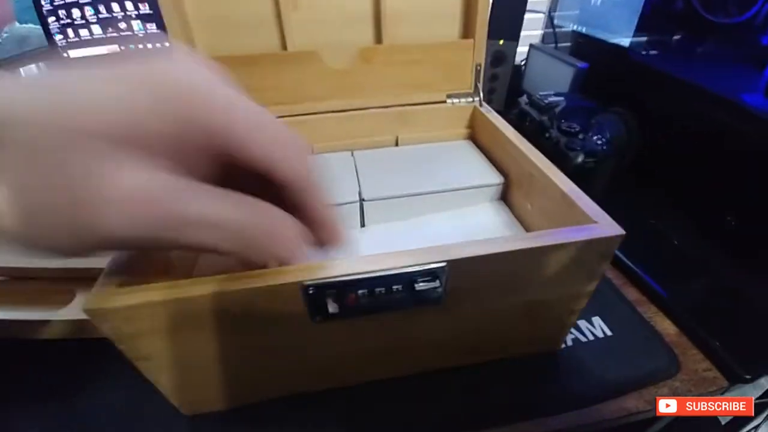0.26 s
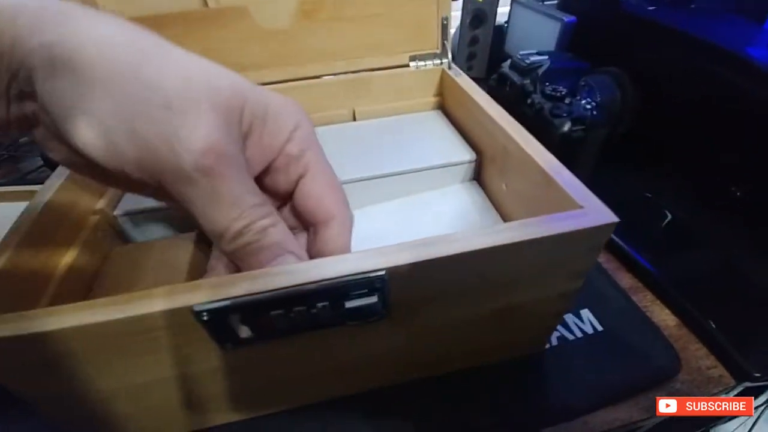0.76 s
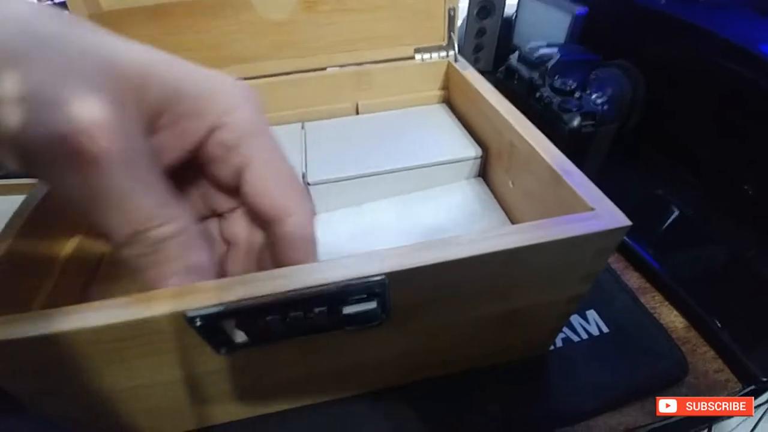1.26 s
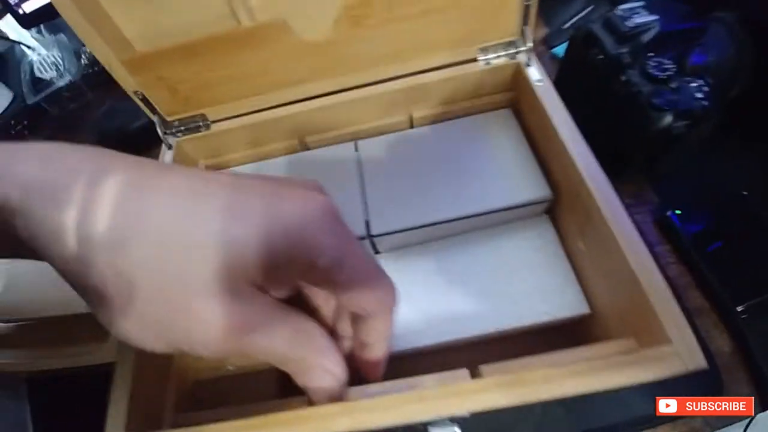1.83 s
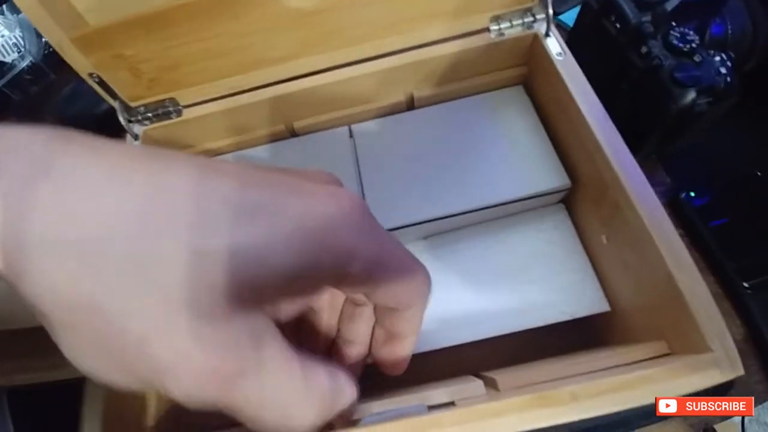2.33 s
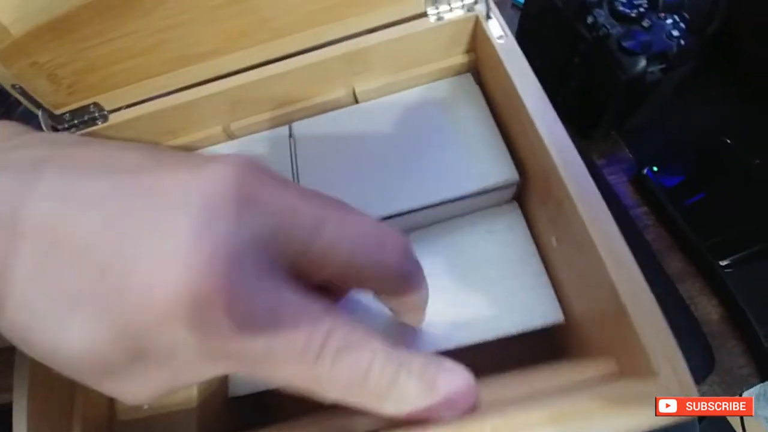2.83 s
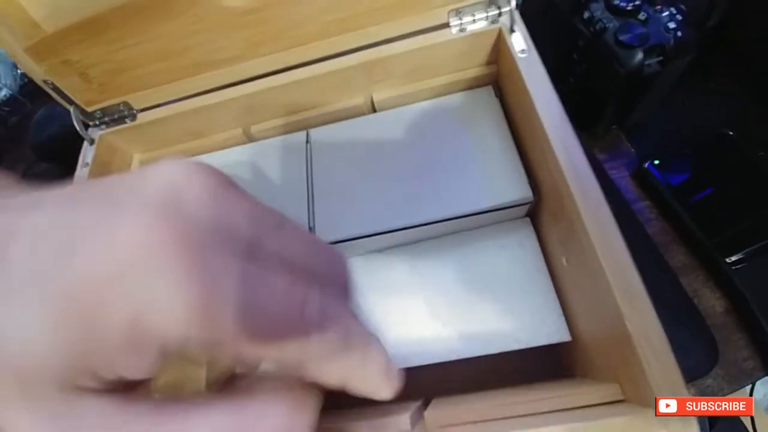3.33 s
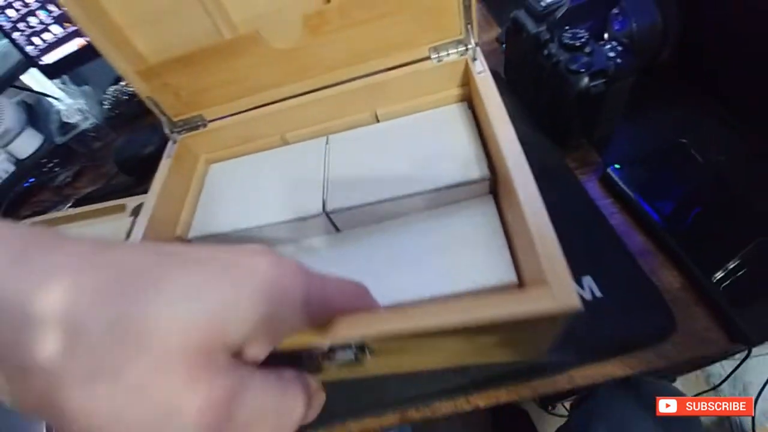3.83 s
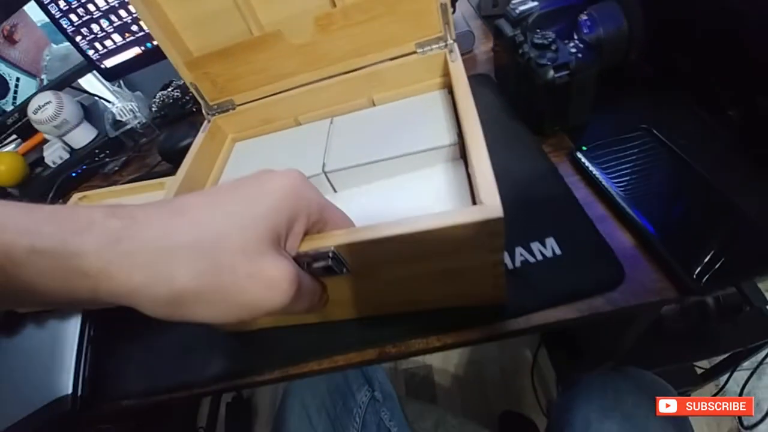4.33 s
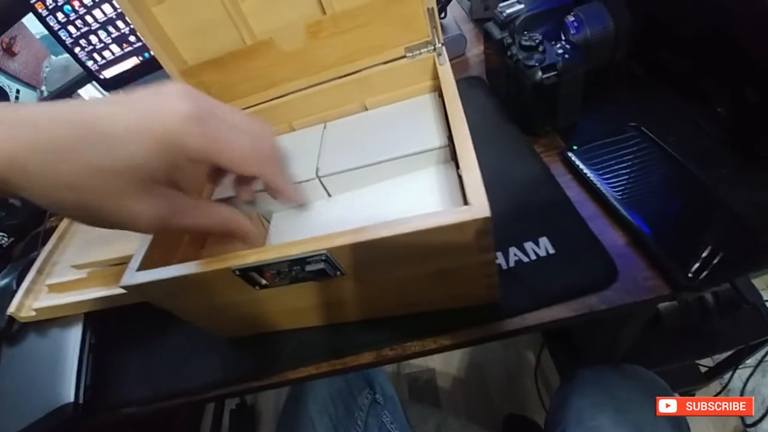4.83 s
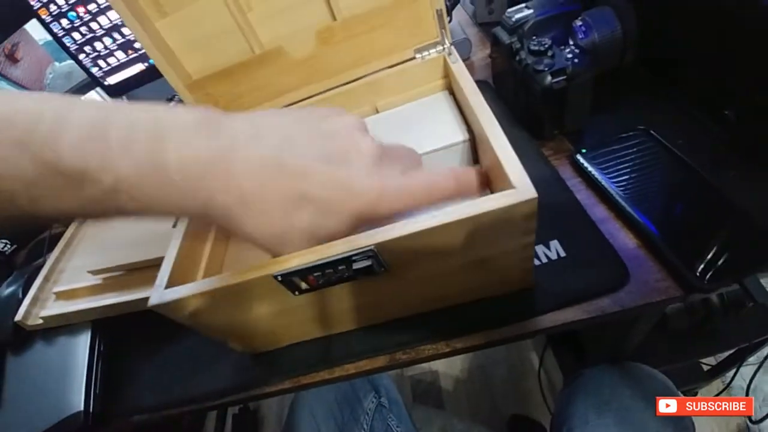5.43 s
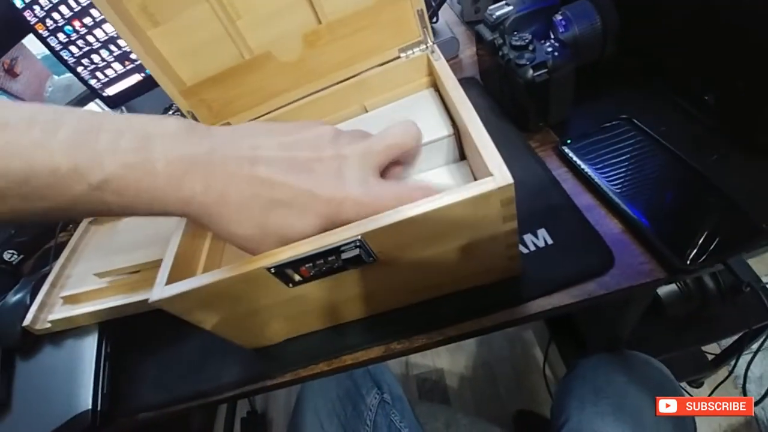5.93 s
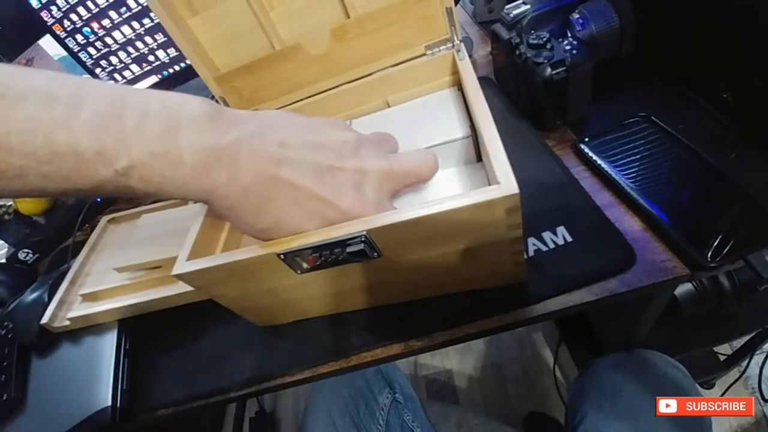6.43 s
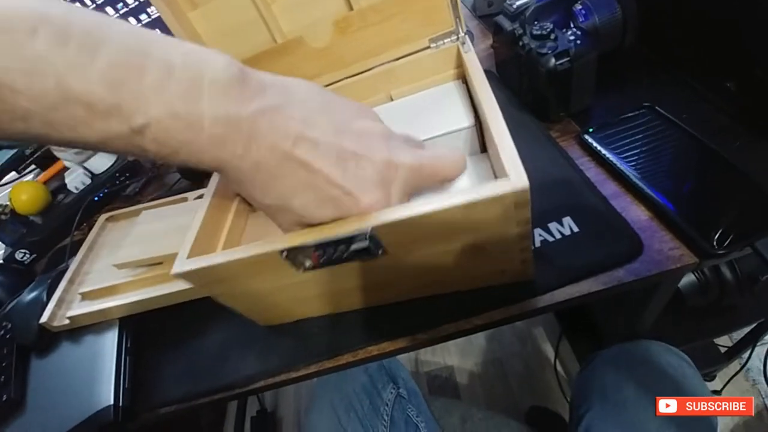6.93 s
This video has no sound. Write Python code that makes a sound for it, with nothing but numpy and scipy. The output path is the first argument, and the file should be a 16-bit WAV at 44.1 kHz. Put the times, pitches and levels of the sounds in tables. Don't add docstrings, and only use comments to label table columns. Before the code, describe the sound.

Close stereo pickup in a small, dull room, with low wavering mains hum and faint fan noise. After a nearly quiet start, sharp snaps crack at 0.25-0.3 s with a rasp, soft desk thud and hollow wood knock. Short gritty foam drags follow from 0.5 to 1.15 s. At 1.2 s a padded block bump rings the box air, then softer tugs swell, ending in a crisp snap at 1.94 s. Harsher bright rasps cluster around 2.3-2.8 s and 3.4-3.7 s, with quieter rubbing between. Clicks at 4.3 s precede a strong tug at 4.5 s and light taps. Around 5.3-5.5 s rasps bunch up with the heaviest desk jolt; snaps strike near 5.85 s. From 6.2 to 6.6 s a divider judders in rapid hollow knocks, brightening into ticks. A last full knock lands at 6.9 s, then brief rubs until about 7.2 s.

```python
import sys
import numpy as np
from scipy import signal
from scipy.fft import rfft, irfft, next_fast_len
from scipy.io import wavfile
from scipy.ndimage import uniform_filter1d

SR = 44100
rng = np.random.default_rng(int(sys.argv[2]) if len(sys.argv) > 2 else 0)


def generate_wav(sig):
    pcm = np.round(np.clip(np.atleast_2d(sig).T, -1, 1) * 32767).astype(np.int16)
    wavfile.write(sys.argv[1], SR, pcm)


def linear_from_db(decibels):
    return 10 ** (np.asarray(decibels, float) / 20)


N = 316197


def in_time(rows):
    time_s, *columns = np.transpose(rows)
    return [np.interp(np.arange(N) / SR, time_s, column) for column in columns]


def at_hz(points, hz):
    points = np.array(points, float)
    return np.interp(np.log(hz + 1), np.log(points[:, 0] + 1), points[:, 1])


def rms_one(x):
    return x / np.sqrt(np.mean(x ** 2) + 1e-20)


def band(x, order, low_hz, high_hz):
    return signal.sosfilt(signal.butter(order, [low_hz, high_hz], "band", fs=SR, output="sos"), x)


def lowpass(x, order, hz):
    return signal.sosfilt(signal.butter(order, hz, fs=SR, output="sos"), x)


def drift(rate_hz):
    r = np.exp(-80 * np.pi * rate_hz / SR)
    noise = rng.standard_normal(N // 40 + 2002)
    slow = signal.lfilter([1], [1, -2 * r, r * r], noise)[2000:]
    return np.interp(np.arange(N) / 40, np.arange(len(slow)), rms_one(slow))


def resonance(x, hz, width_hz):
    r = np.exp(-np.pi * width_hz / SR)
    zeros = np.array([1, 0, -1]) * (1 - r * r) / 2
    return signal.lfilter(zeros, [1, -2 * r * np.cos(2 * np.pi * hz / SR), r * r], x)


def resonance_twice(x, hz, width_hz):
    return resonance(resonance(x, hz, width_hz), hz, width_hz)


def ring(clicks, hz, t60_s):
    r, w = linear_from_db(-60 / (t60_s * SR)), 2 * np.pi * hz / SR
    return signal.lfilter([0, np.sin(w)], [1, -2 * r * np.cos(w), r * r], clicks + 1e-18)


def strikes(times_s, gains):
    clicks = np.zeros((2, N))
    clicks[:, (np.array(times_s) * SR).astype(int)] = gains
    return clicks


def grains(per_s, spread_db):
    height_db = spread_db * np.minimum(rng.exponential(1, N), 4)
    caught = (rng.random(N) < per_s / SR) * linear_from_db(height_db)
    return caught * rng.standard_normal((2, 2, N)) + 1e-18


def rubbed(slips, peaks, patchy_db, shift_hz, low_hz, high_hz, favoured_hz, favour_db, reach):
    coarse_time = np.arange(0, N, 32)
    gains_db = np.array([db + patchy_db * drift(shift_hz)[::32] for hz, width_hz, db in peaks])
    distance = np.log(np.array(peaks)[:, :1] / favoured_hz[::32]) / reach
    gains = linear_from_db(gains_db + favour_db * np.exp(-distance ** 2))
    gains /= np.sqrt(np.sum(gains ** 2, axis=0))
    out = 0
    for k, (hz, width_hz, db) in enumerate(peaks):
        gain = np.interp(np.arange(N), coarse_time, gains[k])
        out = out + gain * rms_one(resonance_twice(slips[k % 2], hz, 1.6752 * width_hz))
    return rms_one(band(out, 2, low_hz, high_hz))


# peak_s, rise_s_per_20db, fall_s_per_20db, rasp_db, wall_share_db
TUGS = [(0, .01, 0.0805, -49.5, -2.5), (0.289, 0.0115, 0.0683, -19.5, -9.5),
        (1.246, 0.106, 0.0209, -43, 1.5), (1.361, 0.2021, 0.0521, -32.5, 0),
        (1.648, 0.1265, 0.0635, -43, 2), (1.948, 0.1031, 0.0062, -28, 5.5), (2.448, 0.04, 0.05, -18, -11),
        (2.654, 0.006, 0.016, -22.5, -11), (2.735, 0.05, 0.1, -21.5, -8), (3.23, 0.0331, 0.0213, -28.5, -2),
        (3.443, 0.014, 0.024, -18.5, -12), (3.847, 0.1298, 0.0481, -27, 4.5),
        (4.522, 0.12, 0.015, -17, -10.5), (5.268, 0.0023, 0.0933, -21, -2.5), (5.43, 0.07, 0.03, -17, -2.5),
        (5.65, 0.0485, 0.1358, -26.5, -9), (5.756, 0.0305, 0.1591, -30.5, -4), (5.945, 0.03, 0.11, -27, -7),
        (6.13, 0.1226, 0.5536, -28, 2.5), (6.135, 0.06, 0.14, -24.5, 3), (6.616, 0.0864, 0.0518, -26, -0.5),
        (6.801, 0.2877, 0.1356, -36, -8)]
# start_s, length_s, entry_db, exit_db, wall_share_db
DRAGS = [(0.496, 0.08368, -43, -48.5, -1), (0.699, 0.065094, -36, -29.5, -4),
         (0.834, 0.091785, -33, -29.5, 5), (0.98, 0.1298, -35.5, -35, -1), (1.12, 0.07674, -34.5, -60, -2),
         (1.489, 0.091, -49.5, -59.5, -1), (1.711, 0.098, -63.5, -61.5, -2.5), (2.206, 0.036, -38, -31, -4),
         (2.287, 0.03938, -43, -43.5, 7), (2.326, 0.11, -30, -24, -9), (2.462, 0.034, -22, -25, -11),
         (2.5, 0.07, -45, -66, -15), (2.602, 0.1302, -50.5, -51.5, -3), (2.825, 0.18539, -43, -48, -3.5),
         (3.023, 0.06515, -66, -64.5, 2), (3.493, 0.06321, -42.5, -28.5, 2.5),
         (3.564, 0.10202, -24.5, -19.5, 1), (3.892, 0.09936, -45, -41.5, 3.5),
         (4.013, 0.20053, -51, -56.5, -4.5), (4.531, 0.07869, -32, -63, -14.5),
         (4.708, 0.1919, -70.5, -58.5, -7), (4.934, 0.0728, -29.5, -28.5, -14.5),
         (6.345, 0.1848, -37.5, -34, 3.5), (6.895, 0.13665, -30, -38.5, 5.5),
         (7.051, 0.1353, -33.5, -30, 1),
         (0.254, 0.01942, -37.5, -25.5, -6), (0.443, 0.0435, -60, -47.5, 0),
           (0.601, 0.0798, -62.5, -64.5, -3), (1.955, 0.057986, -27, -42.5, 4.5),
           (2.1, 0.0975, -58.5, -63.5, 0), (4.238, 0.04417, -48.5, -39.5, -5.5),
           (4.29, 0.1543, -38, -35, -1), (5.01, 0.14846, -23, -37, -7), (5.198, 0.0351, -56.5, -59, 13),
           (5.239, 0.02132, -26.5, -20, 0), (5.579, 0.04053, -60.5, -50, 5),
           (5.5, 0.0767, -56.5, -66.5, 1.5), (3.302, 0.12, -82.5, -77.5, -4), (4.62, 0.0782, -75, -77, -6),
           (1.408, 0.0454, -63.5, -78.5, 4), (1.534, 0.02292, -63.5, -50, 8), (5.889, 0.05, -30, -27, -7),
           (5.34, 0.05, -40, -33, 0), (5.44, 0.02, -24, -25, -3), (3.455, 0.035, -36, -43, 0),
           (2.712, 0.02, -31, -26, -8), (3.405, 0.025, -62, -48, -10)]
TOUCH_DB = 26
ATTACK_DB_S, RELEASE_DB_S = 1699.5, 680.5
MEAN_DB, REST_DB = -36.5, -82


def pressure(follows, share, release_db_s, attack_db_s=ATTACK_DB_S):
    t = np.arange(0, N + 32, 32) / SR
    peak_s, rise_s, fall_s, peak_db, tug_share_db = np.transpose(TUGS)[..., None]
    early_s = np.maximum(peak_s - t, 0)
    late_s = np.maximum(t - peak_s, 0)
    tugs_db = peak_db - 20 * early_s / rise_s - 20 * late_s / fall_s
    untouched_db = ATTACK_DB_S * np.maximum(early_s - TOUCH_DB / 20 * rise_s, 0)
    tugs_felt_db = follows * (tugs_db - MEAN_DB) + share * tug_share_db - untouched_db

    start_s, length_s, entry_db, exit_db, drag_share_db = np.transpose(DRAGS)[..., None]
    drags_db = entry_db + (exit_db - entry_db) * np.clip((t - start_s) / length_s, 0, 1)
    edges_db = attack_db_s * np.maximum(start_s - t, 0)
    edges_db = edges_db + release_db_s * np.maximum(t - start_s - length_s, 0)
    drags_felt_db = follows * (drags_db - MEAN_DB) + share * drag_share_db - edges_db

    power = np.sum(linear_from_db(np.vstack([tugs_felt_db, drags_felt_db]) + MEAN_DB) ** 2, axis=0)
    return np.interp(np.arange(N) / SR, t, 10 * np.log10(power + linear_from_db(REST_DB) ** 2))


# centre_hz, width_hz, level_db
RASP = [(5864.5, 1180.5, 3.5), (6904.5, 360.8, -8), (7224.3, 508.5, -2.5), (7925, 633.6, -2),
        (8526.7, 279.8, -7), (9005.1, 230, -10), (9280, 630, -18), (8060, 90, -11), (6640, 160, -8)]
COARSE = [(2571.5, 1142.3, -9.5), (3272.6, 994.6, 4), (3843.8, 1748, -12.5), (4768.4, 195.8, -2.5),
          (4786.7, 780, -6), (5150, 220, -4), (3850, 200, -9)]
FINE = [(10848, 1600, -20), (11556, 744, -8.5), (12438, 680, -3), (14084, 970, -1), (15280, 710, -6)]
# time_s, coarse_db, fine_db, box_open_db, left_right_db
CONTACT = [(.06, 5, -4, 0, 2), (.28, -1.5, 1.5, -1, 3), (.98, 4, -2, -8.5, 3.5), (1.3, 0, 2, 4.5, 3.5),
           (1.52, 4, -6, -4, 2), (1.7, -3.5, -0.5, 10, 2), (1.95, -2.5, -2.5, -15.5, 0.5),
           (2.15, -5, -0.5, 8, 1), (2.36, -5, 2, -9, 1), (3.6, -3.5, -2.5, -8, 2), (4.15, -4.5, 3, -7, 0.5),
           (4.6, -4, -9, -5, 2), (5.05, -5, 1, 0, 2.5), (5.45, -1, -2.5, -5.5, 2), (6.05, 0.5, 1.5, -3, 4),
           (6.5, 1.5, 2, -17, 2), (6.8, -8.5, -1, -8, 2), (7, 2.5, 0.5, -9, 1.5)]
# time_s, fine_face_hz, coarse_face_hz
PATCH = [(0, 7000, 3000), (.3, 6700, 5150), (.6, 7500, 5100), (.72, 8000, 3750), (1.15, 8000, 3900),
         (1.9, 8300, 5200), (2.23, 8100, 3400), (2.37, 8600, 5100), (2.48, 7700, 4800), (2.65, 6600, 4800),
         (2.8, 6600, 4800), (3.6, 7250, 4000), (4.3, 8000, 5000), (4.5, 7700, 3200), (5.27, 8400, 5300),
         (5.7, 7700, 5000), (6.2, 7900, 3200), (7.17, 7600, 4000)]
COARSE_FOLLOWS, FINE_FOLLOWS, FINE_DB = -0.09756, 0.2401, -13.5


def foam():
    rasp_db = pressure(1, 0, RELEASE_DB_S)
    firm_db = rasp_db - MEAN_DB
    coarse_db, fine_db, _, pan_db = in_time(CONTACT)
    coarse_db = coarse_db + COARSE_FOLLOWS * firm_db
    fine_db = fine_db + FINE_DB + FINE_FOLLOWS * firm_db
    slips = grains(8000, spread_db=-1.0) * linear_from_db(1.5638 * drift(34))
    fine_hz, coarse_hz = in_time(PATCH)
    out = rubbed(slips, RASP, 3.254, 12.593, 5047, 9674.3, fine_hz, favour_db=7.0, reach=.07)
    out += linear_from_db(coarse_db) * rubbed(slips, COARSE, 4.89, 14.445, 1600, 5668.6, coarse_hz, favour_db=6.0, reach=.1)
    out += linear_from_db(fine_db) * rubbed(slips, FINE, 3.7, 17, 10500, 22000, 2 * fine_hz, favour_db=3.0, reach=.2)
    return linear_from_db(rasp_db + 0.5808) * out, pan_db


# time_s, peak_db, centre_hz
SNAPS = [(0.247, -13, 2809), (0.272, -12, 6600), (0.285, -2, 5100), (0.312, -10, 5100), (0.841, -28, 5000),
         (1.1755, -13, 2444), (1.5527, -28.5, 6716), (1.5694, -32.5, 4060), (1.5858, -18.5, 7424),
         (1.864, -17, 7725), (1.865, -19, 4800), (1.921, -16, 5200), (1.9434, -2, 8230),
         (1.9445, -12, 3600), (2.2751, -21.5, 7910), (3.081, -35.5, 8110), (3.3428, -55.5, 2230),
         (3.489, -20, 8300), (3.991, -20, 1600), (4.288, -14, 8200), (4.307, -15, 7800), (4.316, -20, 7500),
         (4.3267, -6, 8232), (4.345, -19, 7000), (4.518, -8, 7700), (4.6839, -30, 4200), (4.693, -26, 3500),
         (4.7149, -12.5, 8498), (4.7226, -24, 8103), (4.748, -30.5, 3607), (4.793, -46, 3450),
         (5.2644, -7.5, 7790), (5.4294, -23, 8250), (5.8317, -8.5, 7852), (5.655, -14, 7500),
         (5.8466, -1, 5624), (5.849, -6, 2900), (6.8081, -7, 8293), (6.8987, -5, 5088), (6.899, -9, 1800),
         (6.728, -22, 7000), (7.0514, -12, 5628)]
# time_s, peak_db, centre_hz
TICKS = [(6.301, -7, 1500), (6.325, -13, 2900), (6.397, -12, 2400), (6.425, -14, 2000), (6.49, -13, 2200),
         (6.3442, -15, 2323), (6.377, -11.5, 7598), (6.4452, -2, 8043), (6.4529, -13, 2441),
         (6.4743, -14, 3742), (6.5174, -4, 1600), (6.548, -2, 6110), (6.575, -1.5, 7807), (6.6023, 0, 7658),
         (6.603, -10, 3000), (6.6314, -11.5, 7650)]


def snaps():
    t = np.arange(2205) / SR
    out = np.zeros((2, N + 2205))
    decay = linear_from_db(-60 * t / .016) + linear_from_db(-19 - 60 * t / .06)
    for time_s, peak_db, hz in SNAPS + TICKS:
        noise = rng.standard_normal((2, len(t))) * decay
        burst = resonance(noise, hz, hz * .2) + .6 * resonance_twice(noise, hz * .7, hz * 1.2)
        start = round(time_s * SR) + 30
        out[:, start:][:, :len(t)] += linear_from_db(peak_db) * burst / np.abs(burst).max()
    out = out[:, :N]
    dull = lowpass(out, 4, 9500)
    return dull + linear_from_db(-15.0) * (out - dull)


# centre_hz, width_hz, level_db
WALL = [(675.14, 240, -11.5), (845.36, 146.7, -6.5), (957.77, 241.5, 0), (1124.3, 234.71, 3.5),
        (1282, 302.7, 0.5), (1500, 237.34, 0), (1758.7, 160.1, 0), (2012.5, 217.8, -1)]
CAVITY = [(290.84, 160, -8), (406.45, 41.1, -2), (438.72, 94.46, 6), (543.98, 60.78, -6)]
# time_s, favoured_hz
SPOT = [(0, 1085), (1.75, 1150), (1.88, 1541), (2.04, 1500), (2.3, 1400), (2.45, 1220), (3.2, 1580),
        (3.5, 1094), (5.3, 1076), (5.37, 859.8), (5.52, 859.6), (5.65, 1150), (7.17, 1150)]
WALL_FOLLOWS = 0.77186
WALL_ATTACK_DB_S, WALL_RELEASE_DB_S = 902, 455.5
AIR_LAG_S = 0.007263


def box():
    wall_db = pressure(WALL_FOLLOWS, 0.9225, WALL_RELEASE_DB_S, WALL_ATTACK_DB_S)
    lagged_db = np.interp(np.arange(N) - AIR_LAG_S * SR, np.arange(N), wall_db)
    air_db = lagged_db.clip(None, wall_db + 6) + in_time(CONTACT)[2]
    slips = grains(2000, spread_db=1.5) * linear_from_db(1.622 * drift(27))
    spot_hz, = in_time(SPOT)
    walls = rubbed(slips, WALL, 3.279, 6.926, 460, 3218, spot_hz, favour_db=7.0, reach=.19)
    air = rubbed(slips, CAVITY, 3.951, 10.162, 150, 636.76, spot_hz, favour_db=0, reach=.2)
    return linear_from_db(wall_db - 1.0) * walls + linear_from_db(air_db - 4.5) * linear_from_db(2.6 * drift(18.0)) * air


# time_s, cavity_peak_db, wall_re_cavity_db
KNOCKS = [
    (0.343, -15.5, -10.5),
    (1.1775, -26, 8),
    (2.724, -26.5, -14),
    (3.062, -37, -12.5),
    (4.724, -39.5, -30.5),
    (4.747, -37, -36.5),
    (4.97, -25.5, -2.5),
    (5.73, -28.5, -0.5),
    (5.845, -29.5, 4),
    (6.899, -14, -2),
]
# time_s, cavity_peak_db, wall_re_cavity_db
JUDDER = [(6.234, -27, -2), (6.278, -18, -10.5), (6.3, -12, -18.5), (6.324, -18, -1), (6.342, -15.5, -4.5),
          (6.376, -14.5, -3.5), (6.397, -21.5, 8.5), (6.424, -17.5, -0.5), (6.45, -13.5, -9.5),
          (6.473, -30, 8.5), (6.491, -14, -23), (6.518, -13.5, -1), (6.548, -29.5, 12.5), (6.574, -20, 4),
          (6.602, -38, 24), (6.631, -39, 17.5)]
# time_s, cavity_peak_db, wall_re_cavity_db
BUMPS = [(1.18, -9, -10), (1.187, -16, -15), (1.203, -22, -10), (1.218, -26, -10), (1.236, -26, -10),
         (1.262, -30, -10), (1.37, -22, -10), (1.652, -30, -15), (1.765, -28, -20), (1.776, -19, -20),
         (1.79, -23, -20), (1.799, -24, -20), (2.367, -16, -10), (5.436, -30, 12)]
# mode_hz, level_db, t60_s
WOOD = [(436.93, -18, 0.11), (461.17, 9.5, 0.035455), (516.01, 4, 0.036), (902.48, 0, 0.033),
        (1150, 14, 0.020626), (1341.4, 3, 0.014), (1724, -20, .02)]


def knocks(blows, damping, trim_db, contact_hz):
    time_s, cavity_db, wall_db = np.transpose(blows)
    chance_db = rng.normal(0, 1.6, (len(time_s), len(WOOD), 2))
    out = 0
    for k, (hz, db, t60_s) in enumerate(WOOD):
        blow_db = cavity_db + wall_db * (hz > 700) + db + trim_db + chance_db[:, k].T
        out = out + ring(strikes(time_s + 0.0009558, linear_from_db(blow_db)), hz, t60_s / damping)
    return band(out, 3, 260, contact_hz)


# time_s, peak_db
THUMPS = [
    (0.287, -29.5),
    (1.55, -31),
    (5.466, -21.5),
    (6.918, -25.5),
]
# mode_hz, level_db, t60_s
DESK = [(56.236, -8.5, 0.12), (93, -5.5, 0.073)]


def jolts():
    time_s, jolt_db = np.transpose(THUMPS)
    push = lowpass(strikes(time_s, linear_from_db(jolt_db)) + 1e-18, 2, 120)
    return sum(linear_from_db(db) * ring(push, hz, t60_s) for hz, db, t60_s in DESK)


# freq_hz, common_share_0_1
LIKENESS = [(100, .9), (300, .98), (500, .93), (1000, .8), (2500, .5), (5000, .55), (8000, .56),
            (15000, .56)]
# freq_hz, lead_rad
LEAD = [(0, 0), (780, 0), (1460, .5), (2500, 1.5), (3700, 3.4), (4570, 7.3), (5860, 16.6), (6370, 18.7),
        (16600, 18.9)]
# freq_hz, left_right_db
BALANCE = [(60, 6), (110, 3.5), (200, 4), (380, 4.5), (700, 6), (1290, -1), (2380, 0), (4400, 3.5),
           (8120, 5), (15000, 1.5)]


def ports(paths):
    size = next_fast_len(N + 4096)
    hz = np.arange(size // 2 + 1) * SR / size
    one, other = rfft(paths, size)
    alike = np.clip(at_hz(LIKENESS, hz), 0, 1)
    tilt = linear_from_db(at_hz(BALANCE, hz) / 2)
    right = (alike * one + np.sqrt(1 - alike ** 2) * other) * np.exp(-1j * at_hz(LEAD, hz))
    return irfft(np.array([one * tilt, right / tilt]), size)[:, :N]


ROOM_T60_S, ROOM_DB = 0.06432, -13.5


def room(x):
    t = np.arange(SR // 3) / SR
    dull = signal.lfilter([1], [1, -.6], rng.standard_normal((2, len(t))))
    tail = dull * linear_from_db(-60 * t / ROOM_T60_S) * (t > .006)
    tail /= np.sqrt(np.sum(tail ** 2, axis=1, keepdims=True))
    return signal.fftconvolve(x, tail, axes=1)[:, :N]


# freq_hz, rms_db
HUM = [(59.8, -55), (119.7, -57)]
# time_s, level_db
MAINS_LOAD = [(0, 1), (1.8, 1), (2.2, -2.5), (3.7, -3), (4.2, -1), (5.3, 1), (7.17, 2.5)]
# freq_hz, level_db_per_hz
FLOOR = [(15, -61), (25, -29), (70, -12.5), (138, -6), (183, -15.5), (249, -10.5), (1340, -42),
         (1820, -27.5), (3380, -42.5), (7940, -65), (12000, -79), (15600, -100), (22000, -120)]
FLOOR_DB = -50.5
REDUCER_S, REDUCER_FOLLOWS, REDUCER_DB = 0.03, 0.19, 1.5


def background():
    hz, t = np.arange(N // 2 + 1) * SR / N, np.arange(N) / SR
    load_db, = in_time(MAINS_LOAD)
    spectrum = rfft(rng.standard_normal((2, N))) * linear_from_db(at_hz(FLOOR, hz))
    fans = linear_from_db(FLOOR_DB - 4.5) * rms_one(irfft(spectrum, N))
    hum = 0
    for mains_hz, db in HUM:
        level = np.sqrt(2) * linear_from_db(db + load_db + 2.433 * drift(16))
        wander_rad = 0.662 * np.array([drift(3.5), drift(3.91)])
        hum = hum + level * np.sin(2 * np.pi * mains_hz * t + wander_rad)
    front_db = pressure(0.7796, 0, RELEASE_DB_S) - MEAN_DB
    reducer_db = REDUCER_DB + REDUCER_FOLLOWS * uniform_filter1d(front_db, int(REDUCER_S * SR))
    return (fans + hum) * linear_from_db(reducer_db)


def scene():
    rasp, pan_db = foam()
    wood = box()
    wood += knocks(KNOCKS, 0.6564, trim_db=-16.5, contact_hz=3000)
    wood += knocks(JUDDER, 1.7, trim_db=-12, contact_hz=1656.5)
    wood += knocks(BUMPS, 0.6, trim_db=-16.5, contact_hz=650)
    pan = linear_from_db(np.array([[.5], [-.5]]) * (pan_db - 3.5))
    near = ports(rasp + snaps()) * pan + ports(wood)
    return near + linear_from_db(ROOM_DB) * room(near) + ports(background() + jolts())


def roll_off(x):
    return signal.sosfilt(signal.butter(12, 17010, fs=SR, output="sos"), x)


def record(dry):
    dry = signal.sosfilt(signal.butter(2, 40, "high", fs=SR, output="sos"), dry)
    rounded = 1.4 * np.tanh(dry / 1.09)
    top_cut = signal.cheby2(18, 50, 16350, fs=SR, output="sos")
    return roll_off(signal.sosfilt(top_cut, rounded))


dry = scene()
out = record(dry)
generate_wav(out)
```